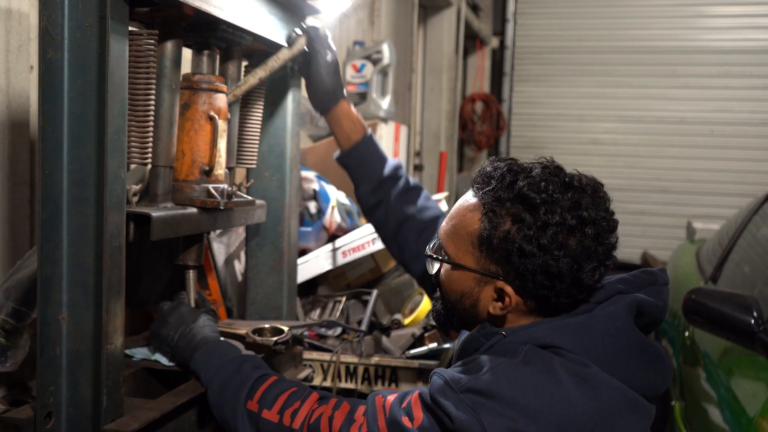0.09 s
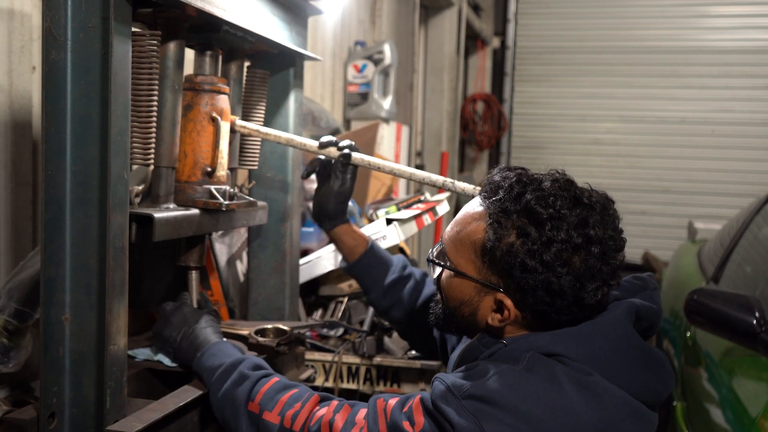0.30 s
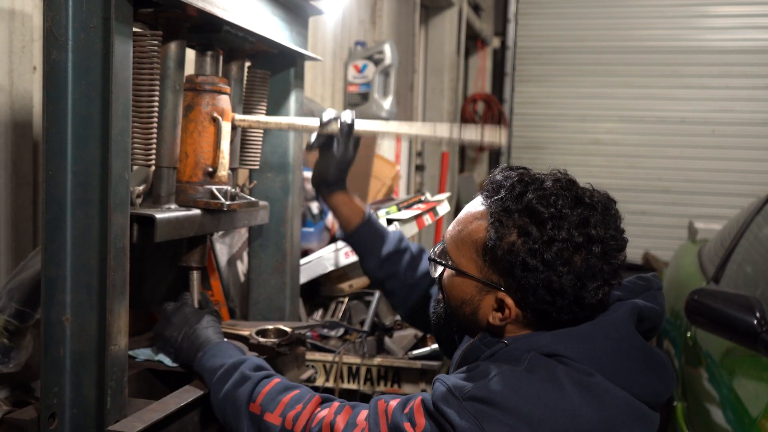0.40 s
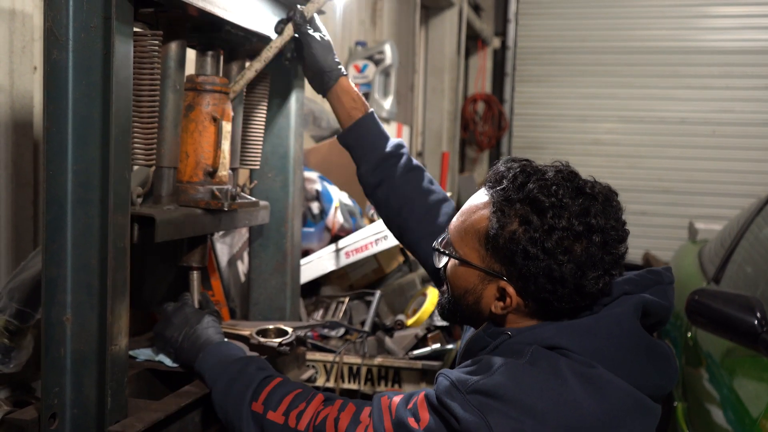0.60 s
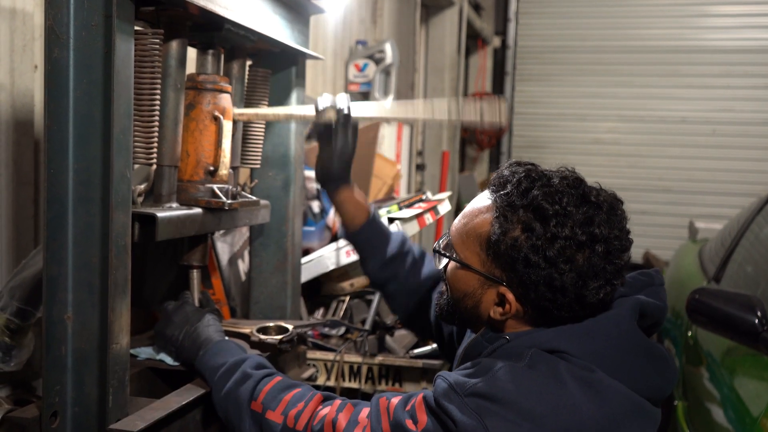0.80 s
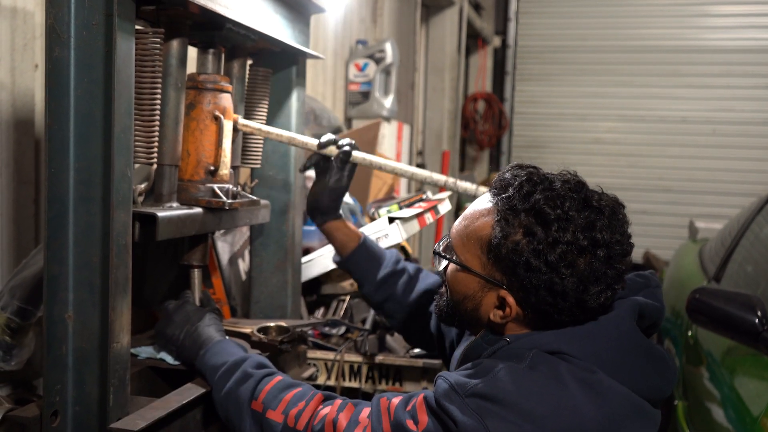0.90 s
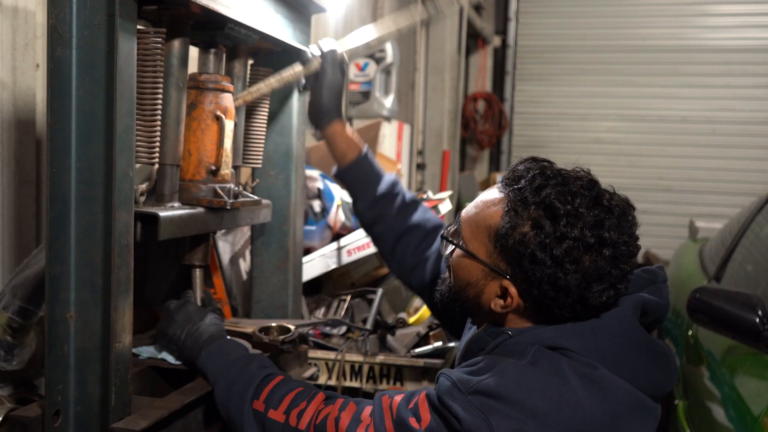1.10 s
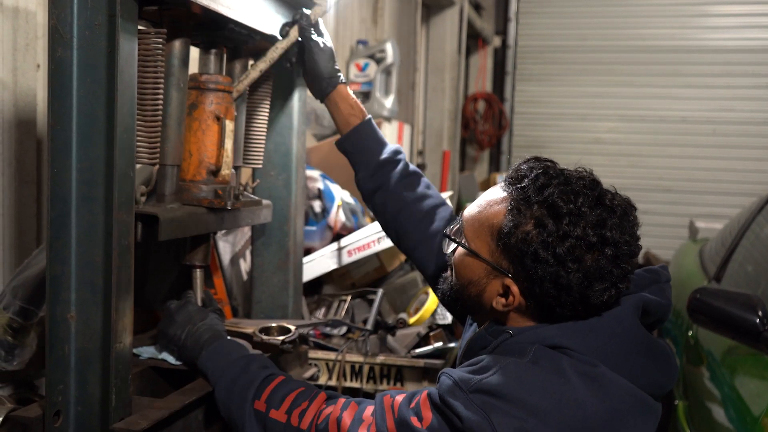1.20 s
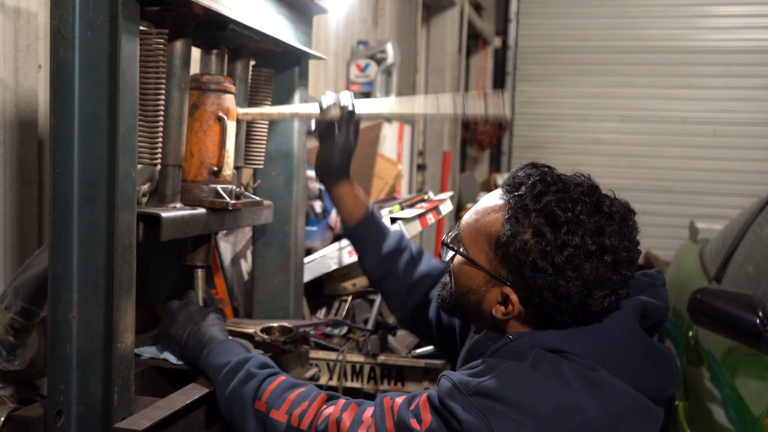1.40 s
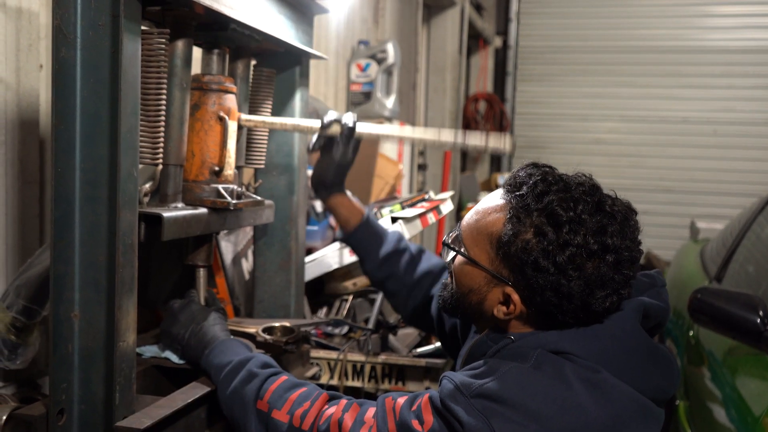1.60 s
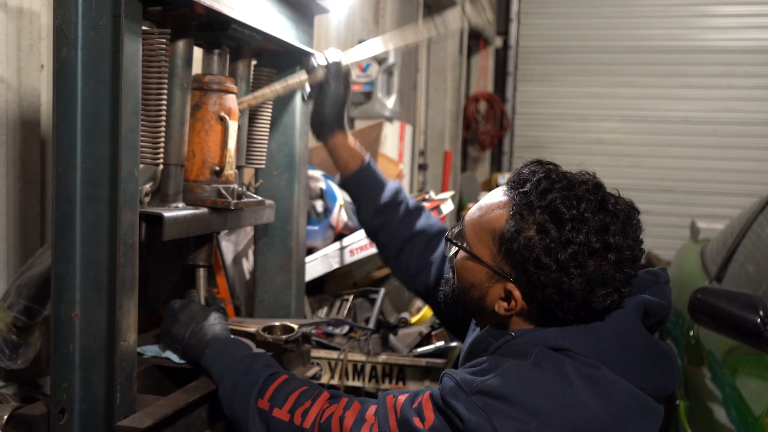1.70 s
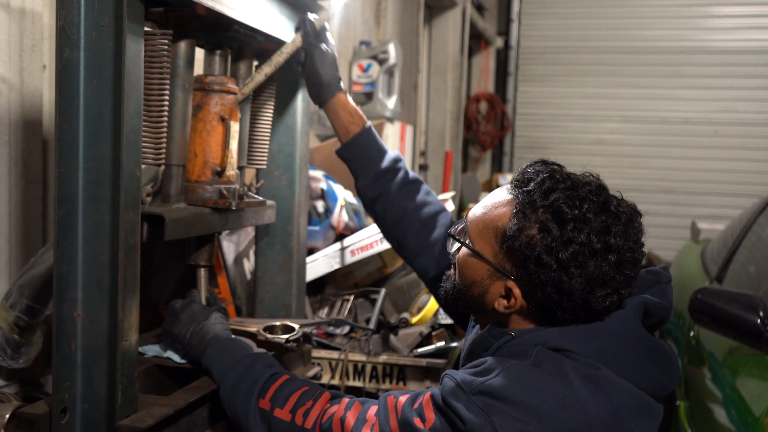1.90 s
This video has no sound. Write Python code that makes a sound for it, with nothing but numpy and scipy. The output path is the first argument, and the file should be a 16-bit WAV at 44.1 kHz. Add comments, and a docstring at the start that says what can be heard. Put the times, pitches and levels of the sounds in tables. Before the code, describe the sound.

A loose steel jack handle clacks, knocks and rattles as it is pumped on a shop press. Early on it bangs down hard and the press rings, then the clacking continues. The microphone is nearby in a slightly echoing garage.

```python
"""The loose steel handle of a bottle jack, pumped on a shop press in a garage, on one microphone nearby.
At each turn of the stroke it takes up its play: the tube skids and pings, the linkage clacks, then the
handle knocks and rattles in its socket. Once it bangs down hard and sets the press frame ringing.
Each contact is a crack of chattering steel plus ringing modes, heard direct and off the room.
Behind the jack lie room air and a low rumble."""
import sys
import numpy as np
from scipy import signal
from scipy.fft import rfft, irfft
from scipy.io import wavfile
from scipy.ndimage import uniform_filter1d

SR = 44100
rng = np.random.default_rng(int(sys.argv[2]) if len(sys.argv) > 2 else 0)


def dump_mix(stems):
    """Bounce the given channels to the path in sys.argv[1] as a 16-bit WAV at rate SR."""
    frames = np.atleast_2d(stems).T  # one column per channel
    limited = np.clip(frames, -1, 1)  # hard clip at full scale
    pcm = np.round(limited * 32767).astype(np.int16)
    wavfile.write(sys.argv[1], SR, pcm)


N = 85995

# The garage's reverberation by band: centre_hz, level_db, t60_s
GARAGE_BANDS = [(151, 4.5, 0.72), (404, 2.5, 0.56), (805, 3.5, 0.48), (1460, -3, 0.49), (3180, -5.5, 0.48),
                (6000, -6.5, 0.4), (10000, -7.5, 0.32), (15000, -13.5, 0.25)]
# Spectra of the room air, the rumble and the sliding handle: frequency_hz, relative_db
AIR_SPECTRUM = [(47, -17.5), (80, -12.5), (120, -20), (160, -14.5), (242, -20.5), (322, -24.5), (763, -29),
                (1090, -34), (2160, -38), (3360, -39.5), (6670, -50.5), (15800, -60)]
RUMBLE_SPECTRUM = [(12, 6.5), (22, -1), (45, -3.5), (70, -21), (120, -58)]
SWISH_SPECTRUM = [(500, -24), (1500, -8), (3500, 1.5), (6000, -9), (16000, -21)]
# The rumble's rise and fall: time_s, level_db
RUMBLE_SWELLS = [(0, -40.5), (.2, -39.5), (.3, -29), (.42, -27), (.55, -29.5), (.75, -38.5), (1.0, -31.5),
                 (1.2, -31.5), (1.33, -32), (1.5, -26), (1.7, -33.5), (1.95, -29)]

# Steel contacts at the press: start_s, level_db, bass_db, treble_db
TUBE_PINGS = [(.2323, -8.5, -5, 4.5), (.8046, -11, -17, -7), (1.4048, -23, 5, -14)]
LINKAGE_CLACKS = [(.2470, -14.5, -6, 4.5), (.2547, -6.5, 3.5, -8), (.2580, -19, 0, -12),
                  (.8212, -5.5, -29, -1.5), (.8272, -9, 4, 0.5), (1.4200, -16.5, -9, 1.5),
                  (1.4285, -14.5, 7, -1.5), (1.4435, -24.5, 5, -30)]
SOCKET_KNOCKS = [(.3486, -9, -0.5, 1), (.3618, -13, 5.5, 0), (.9492, -15.5, 5, -1), (.9620, -25, -8, 7.5),
                 (1.5564, -11, 0, -2.5), (1.5698, -22.5, 0, 7), (1.5905, -25.5, 14, -27)]  # the handle knocks and bounces
HANDLE_RATTLES = [(.2285, -26, 7, -4), (.4245, -26, 20, 4), (.4497, -12, 4, 4.5), (.7975, -28, -12, 6.5),
                  (1.0110, -22.5, 11.5, -26), (1.0165, -28, 14, 16), (1.0305, -15, 3, -18),
                  (1.0345, -22, 2, -2), (1.0492, -14.5, -8, -2.5), (1.3970, -31, -1, 0),
                  (1.6235, -26.5, 7, -7), (1.6440, -20, 8, 4), (1.6705, -27.5, 9, -3)]  # near the top of the stroke
RIM_CHINKS = [(.4615, -18.5, -2, -2), (.4785, -17.5, -4, -4.5), (1.1155, -21.5, 2, 4)]  # handle against the socket's rim
HANDLE_CLINKS = [(1.6522, -11.5, 0, -1.5)]  # at the top of the last stroke
PIVOT_TAPS = [(.0333, -24, -1.5, 7), (1.1478, -27, 4, 2), (1.7784, -22, -10, 1)]
FRAME_BANGS = [(.6612, -1.46, 0.5, 1)]
FRAME_JUDDERS = [(.6710, -21, -5, -8), (.6795, -16, -1, 12), (.6935, -10.5, -4.5, -11),
                 (.7020, -12, -3, -9), (.7105, -16.5, -0.5, 2)]
# Skids just before the clacks: start_s, peak_db
TUBE_SLIPS = [(.2400, -10.5), (.8125, -5.5), (1.4120, -28)]
# Parts that ring on after a contact: start_s, level_db
HIGH_RINGS = [(0.8284, -33), (1.017, -49)]
HOLLOW_RINGS = [(.2600, -25), (.8300, -24.5), (1.1500, -37.5), (1.4400, -29.5), (1.7800, -41)]

# The colour of each contact's crack: frequency_hz, relative_db
PING_SPECTRUM = [(200, -21.5), (700, -34), (1500, -22.5), (2500, -3.5), (3400, -4.5), (4200, -9.5),
                 (4900, -9.5), (6000, -23), (10000, -37), (15000, -53)]
CLACK_SPECTRUM = [(150, -17), (400, -10.5), (700, -8.5), (1000, -13.5), (1450, -1), (1800, -6), (2500, 2.5),
                  (3400, -2.5), (5000, -3.5), (6200, -9), (8500, -11), (10500, -18.5), (15000, -16)]
KNOCK_SPECTRUM = [(150, -21.5), (350, -7.5), (550, -7), (950, -7.5), (1450, -0.5), (1800, -6), (2400, -0.5),
                  (3300, 0), (4400, -5), (6000, -15), (8000, -18), (10000, -27), (15000, -36)]
RATTLE_SPECTRUM = [(150, -19.5), (370, -14), (700, -21), (1450, -8.5), (1750, -14), (2200, -3.5),
                   (2800, -0.5), (3900, -7.5), (4800, -3), (5900, -18.5), (6700, -13.5), (8000, -27),
                   (15000, -33)]
CHINK_SPECTRUM = [(200, -15), (750, -22), (1200, -24), (1900, -27), (2600, 7), (3000, -4.5), (3800, -11),
                  (4800, -7), (6000, -11.5), (8500, -19), (15000, -34)]
CLINK_SPECTRUM = [(200, -18.5), (600, -19), (980, -9.5), (1300, -9), (1750, -8), (2150, 1.5), (2800, -9),
                  (3300, 4.5), (3900, -10.5), (4700, -1), (5600, -6.5), (6500, -14.5), (15000, -34)]
TAP_SPECTRUM = [(200, -16), (550, -20), (750, 8), (1000, -7.5), (1450, 1.5), (1900, -7.5), (2600, 1),
                (3500, -2.5), (4500, -15), (7000, -22), (15000, -50)]
BANG_SPECTRUM = [(150, -28.5), (350, -21), (550, -11.5), (820, -4), (1020, -11), (1300, -7.5), (1850, 1),
                 (2600, -1), (3200, -5.5), (4500, -6), (6000, -18), (8500, -26.5), (10500, -38),
                 (15000, -36.5)]

# The modes each part rings with: pitch_hz, level_db, t60_s
TUBE_MODES = [(1080, -20, 0.19), (2210, -20, 0.22), (3355, -0.5, 0.044), (3550, 1, 0.036),
              (4770, -7.5, 0.071), (4930, -11, 0.13), (6650, -13.5, 0.07), (8560, -24, 0.08),
              (10580, -24, 0.055)]
LINKAGE_MODES = [(1485, -20.5, 0.057), (2417, -14.5, 0.072), (2827, -23, 0.16), (3410, -15.5, 0.14),
                 (3566, -20.5, 0.12), (4440, -18, .08), (4760, -15.5, 0.062), (4970, -28, .08)]
SOCKET_MODES = [(367.2, -29.5, 0.34), (541, -22.5, 0.13), (730, -25, 0.2), (1474, -15.5, 0.078),
                (2113, -18, 0.12), (2466, -18, 0.12), (3330, -3.5, 0.032), (3260, -28, .13),
                (4130, -7, 0.018)]
HANDLE_MODES = [(2240, -23, 0.041), (2590, -9.5, 0.08), (2880, -12, 0.099), (3250, -8, 0.077),
                (4724, -10.5, 0.058), (5110, -33, 0.13), (5230, -18, 0.21), (6690, -18, .07)]
RIM_MODES = [(2466, -5.5, 0.032), (2740, -9, 0.045), (2880, -3, 0.049), (5140, -18.5, 0.087)]
CLINK_MODES = [(980, -23, 0.14), (2166, -15, 0.088), (3240, -5.5, 0.033), (3180, -27, 0.45),
               (4680, -9, 0.044), (4930, -13, 0.055), (5560, -19.5, .12), (9100, -37, 0.089)]
PIVOT_MODES = [(2590, 1, 0.031), (3360, 3.8, 0.027), (3590, 2.6, 0.03)]
FRAME_MODES = [(711, -23, 0.38), (818, -16, 0.27), (841, -21.5, 0.52), (947, -23.5, 0.32),
               (1140, -29, 0.14), (1686, -18, 0.16), (1740, -17, 0.18), (1887, -16.5, 0.5),
               (1890, -14, 0.24), (1930, -16.5, 0.2), (2080, -13, 0.22), (2270, -28, .22),
               (2514, -15, 0.29), (2580, -12.5, .25), (2710, -15.5, 0.28), (3370, -21, 0.35)]
HOLLOW_MODES = [(689, 2.5, 0.17), (768, 1, .22)]

BASS_HZ, TREBLE_HZ = 1120, 5100  # shelf corners for bass_db and treble_db


def from_db(db):
    """Decibels to gain."""
    return 10 ** (np.asarray(db) / 20)


def rms_one(x):
    """Scale to rms 1."""
    return x / np.sqrt(np.mean(x ** 2) + 1e-20)


def db_at(spectrum, hz):
    """Read a spectrum on a log-frequency axis."""
    points_hz, db = np.transpose(spectrum)
    return np.interp(np.log(np.maximum(hz, 1)), np.log(points_hz), db)


def bins_hz(size):
    """Frequencies of a spectrum's bins."""
    return np.arange(size // 2 + 1) * SR / size


def noise(gain):
    """Noise with the given gain per bin, rms 1."""
    return rms_one(irfft(rfft(rng.standard_normal(N)) * gain, N))


def narrow_noise(centre_hz, half_width_hz):
    """Noise gathered round one pitch, rms 1."""
    return noise(1 / (1 + ((bins_hz(N) - centre_hz) / half_width_hz) ** 2))


def causal(gain):
    """Minimum-phase response with this gain, so that nothing sounds early."""
    cepstrum = irfft(np.log(gain + 1e-9))
    half = len(cepstrum) // 2
    cepstrum[1:half] *= 2
    cepstrum[half + 1:] = 0
    return np.exp(rfft(cepstrum))


def add(out, start_s, sound):
    """Mix a sound in at a time."""
    start = int(np.clip(start_s * SR, 0, N - 1))
    out[start:start + len(sound)] += sound[:N - start]


def room_tone():
    """The garage behind the press: steady air, a narrow drone and a swelling low rumble."""
    t, hz = np.arange(N) / SR, bins_hz(N)
    air = from_db(-44) * noise(from_db(db_at(AIR_SPECTRUM, hz)))
    drone = from_db(-48.5) * narrow_noise(centre_hz=763, half_width_hz=61)
    swell = from_db(np.interp(t, *np.transpose(RUMBLE_SWELLS)))
    rumble = swell * noise(from_db(db_at(RUMBLE_SPECTRUM, hz)) * (hz > 4) * (hz < 400))
    return air + drone + rumble


def opening_tail(level_db=-42.5, t60_s=0.38):
    """The room is still dying away from a contact just before the start."""
    fade = from_db(level_db - 60 * np.arange(N) / SR / t60_s)
    return fade * noise(from_db(db_at(RATTLE_SPECTRUM, bins_hz(N))))


def garage_response(early_db=9, early_t60_s=0.1, size=32768):
    """The room at the microphone: dense early echoes off the press, then a tail dying band by band."""
    t, hz = np.arange(size) / SR, bins_hz(size)
    white, out = rfft(rng.standard_normal(size)), 0
    log_centres = np.log([row[0] for row in GARAGE_BANDS])
    for share, (centre_hz, db, t60_s) in zip(np.eye(len(GARAGE_BANDS)), GARAGE_BANDS):
        band = irfft(white * np.interp(np.log(hz + 1), log_centres, share))
        build_s = 0.0076 * (1 + (570 / centre_hz) ** 2)  # the bass swells more slowly
        decay = from_db(-60 * t / t60_s) + from_db(early_db - 60 * t / early_t60_s)
        envelope = decay * (1 - np.exp(-t / build_s))
        out = out + from_db(db) * band * envelope / np.sqrt(np.sum(envelope ** 2))
    return out


def tilt_db(hz, bass_db, treble_db):
    """Two shelves: how dull or bright one contact is."""
    bass = bass_db / (1 + (hz / BASS_HZ) ** 2)
    return bass + treble_db * (1 - 1 / (1 + (hz / TREBLE_HZ) ** 4))


def crack(spectrum, bass_db, treble_db, rise_s, hold_s, t60_s, size=4096):
    """Steel chatters on steel for a few milliseconds, then its dense modes die fast."""
    t, hz = np.arange(size) / SR, bins_hz(size)
    envelope = (1 - np.exp(-t / rise_s)) * from_db(-60 * np.maximum(t - hold_s, 0) / t60_s)
    burst = rfft(rng.standard_normal(size) * envelope)
    burst /= np.sqrt(uniform_filter1d(abs(burst) ** 2, size=61))  # flatten before colouring
    # each contact favours its own patches of the treble
    patches = rms_one(uniform_filter1d(rng.standard_normal(len(hz)), size=70))
    ragged_db = 4 * hz / (hz + TREBLE_HZ) * patches
    colour = rms_one(from_db(db_at(spectrum, hz) + ragged_db))
    gain = colour * from_db(tilt_db(hz, bass_db, treble_db))
    return irfft(burst * causal(gain))[:size // 2] * np.sqrt(hold_s * SR)


def ring(modes, detune=0, treble_db=0, spread_db=1.94, size=16384):
    """Decaying modes, struck with new strengths each time; grip and load shift their pitch (detune)."""
    hz, db, t60s = np.transpose(modes)
    strengths = from_db(db + tilt_db(hz, 0, treble_db) + rng.normal(0, spread_db, len(hz)))
    strengths *= rng.choice([-1, 1], len(hz))
    pitches = hz * (1 + detune * rng.standard_normal(len(hz)))
    out = np.zeros(size)
    for pitch_hz, t60_s, gain in zip(pitches, t60s, strengths):
        t = np.arange(min(size, int(t60_s * SR))) / SR
        out[:len(t)] += gain * from_db(-60 * t / t60_s) * np.sin(2 * np.pi * pitch_hz * t)
    return out


def contacts(rows, spectrum, modes, hold_s, crack_t60_s, ring_db, room_db,
             ring_room_db=-10, rise_s=0.0005, detune=0.0053):
    """A crack and a ring for each row, heard direct and with the room's answer from that spot."""
    cracks, rings = np.zeros((2, N))
    for start_s, db, bass_db, treble_db in rows:
        add(cracks, start_s, from_db(db) * crack(spectrum, bass_db, treble_db, rise_s, hold_s, crack_t60_s))
        add(rings, start_s, from_db(db + ring_db) * ring(modes, detune, treble_db / 2))
    into_room = from_db(room_db) * (cracks + from_db(ring_room_db) * rings)
    return cracks + rings + signal.fftconvolve(into_room, garage_response())[:N]


def hollow_resonance(swell_s=0.0027):
    """Something hollow, perhaps the press bed, swells and rings on after a contact."""
    out = np.zeros(N)
    for start_s, db in HOLLOW_RINGS:
        tone = ring(HOLLOW_MODES)
        swell = 1 - np.exp(-np.arange(len(tone)) / SR / swell_s)
        add(out, start_s, from_db(db) * tone * swell)
    return out


def high_shimmer(t60_s=0.21):
    """A small steel part, perhaps the pivot pin, sings with a cluster of close modes."""
    out, t = np.zeros(N), np.arange(N) / SR
    for start_s, db in HIGH_RINGS:
        shimmer = narrow_noise(centre_hz=12100, half_width_hz=220)
        add(out, start_s, from_db(db - 60 * t / t60_s) * shimmer)
    return out


def handle_swish(centre_s=1.835, width_s=0.021, level_db=-44):
    """One faint swish as the handle slides."""
    swell = np.exp(-.5 * ((np.arange(N) / SR - centre_s) / width_s) ** 2)
    return from_db(level_db) * swell * noise(from_db(db_at(SWISH_SPECTRUM, bins_hz(N))))


def tube_slips(length_s=0.011, swell_db=10, catches_per_s=1400, t60_s=0.019):
    """The tube skids in its socket: a swelling run of tiny catches keeps it ringing until the clack."""
    out = np.zeros(N)
    swell = from_db(np.linspace(-swell_db, 0, int(length_s * SR)))
    damped_modes = [(hz, db / 2, t60_s) for hz, db, _ in TUBE_MODES[2:]]
    for start_s, peak_db in TUBE_SLIPS:
        force = rng.standard_normal(len(swell)) * swell
        catches = rng.random(len(swell)) < catches_per_s / SR
        singing = signal.fftconvolve(force * catches, ring(damped_modes))
        add(out, start_s, from_db(peak_db) * singing / abs(singing).max())
    return out


def pivot_taps():
    """The pump pivot taps lightly."""
    return contacts(PIVOT_TAPS, TAP_SPECTRUM, PIVOT_MODES,
                    hold_s=0.002, crack_t60_s=0.022, ring_db=-8, room_db=-4)


def frame_bang():
    """One hard blow sets the press frame ringing, and the handle judders after it."""
    blow = contacts(FRAME_BANGS, BANG_SPECTRUM, FRAME_MODES,
                    hold_s=0.0019, crack_t60_s=0.032, ring_db=-2, room_db=-0.5, ring_room_db=-19, detune=0)
    judder = contacts(FRAME_JUDDERS, BANG_SPECTRUM, FRAME_MODES,
                      hold_s=0.0024, crack_t60_s=0.046, ring_db=-18, room_db=3.5, detune=0)
    return blow + judder


def loose_handle():
    """The stroke turns: the tube touches its socket, the linkage clacks, the handle knocks about."""
    pings = contacts(TUBE_PINGS, PING_SPECTRUM, TUBE_MODES,
                     hold_s=0.0013, crack_t60_s=0.019, ring_db=-0.5, room_db=9.5)
    clacks = contacts(LINKAGE_CLACKS, CLACK_SPECTRUM, LINKAGE_MODES,
                      hold_s=0.003, crack_t60_s=0.025, ring_db=2.5, room_db=0)
    knocks = contacts(SOCKET_KNOCKS, KNOCK_SPECTRUM, SOCKET_MODES,
                      hold_s=0.003, crack_t60_s=0.016, ring_db=3.5, room_db=-0.1)
    rattles = contacts(HANDLE_RATTLES, RATTLE_SPECTRUM, HANDLE_MODES,
                       hold_s=0.0024, crack_t60_s=0.025, ring_db=-1.5, room_db=-2, rise_s=0.00085)
    chinks = contacts(RIM_CHINKS, CHINK_SPECTRUM, RIM_MODES,
                      hold_s=0.0017, crack_t60_s=0.015, ring_db=0, room_db=-5)
    clinks = contacts(HANDLE_CLINKS, CLINK_SPECTRUM, CLINK_MODES,
                      hold_s=0.0035, crack_t60_s=0.026, ring_db=3, room_db=-3.5)
    return pings + clacks + knocks + rattles + chinks + clinks


def scene():
    """The jack in front, the garage behind it, in mono."""
    jack = loose_handle() + pivot_taps() + frame_bang() + tube_slips()
    after_rings = high_shimmer() + hollow_resonance()
    return (jack + after_rings + room_tone() + handle_swish() + opening_tail())[None]


def record(dry):
    """At the microphone the loudest peaks overload; the top treble is cut."""
    lowpass = signal.cheby2(16, 60, 16250, fs=SR, output="sos")  # 60 dB down from 16250 Hz
    return signal.sosfilt(lowpass, np.clip(dry, -.95, .95))


dry = scene()
out = record(dry)
dump_mix(out)
```